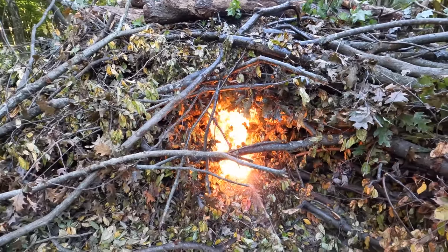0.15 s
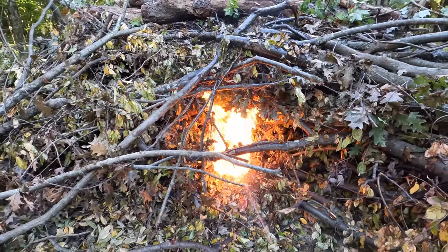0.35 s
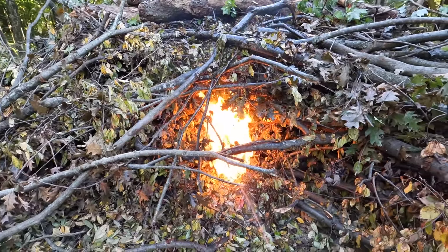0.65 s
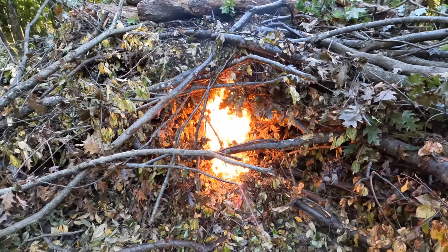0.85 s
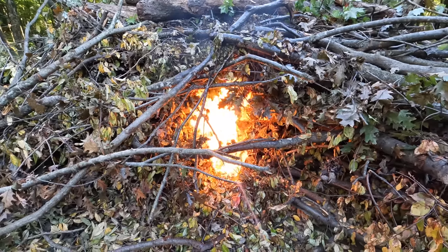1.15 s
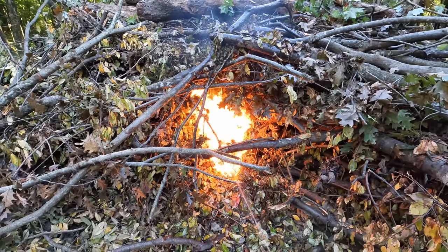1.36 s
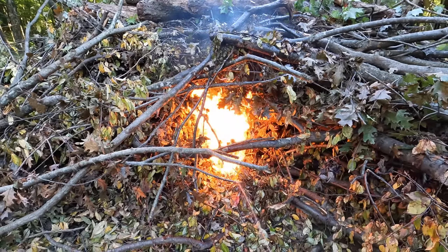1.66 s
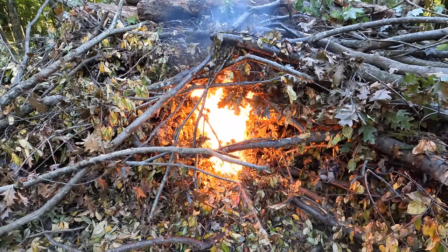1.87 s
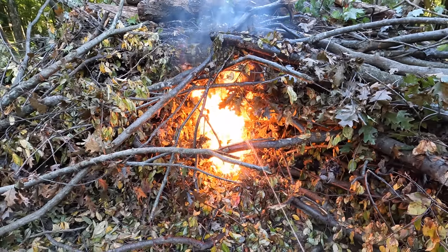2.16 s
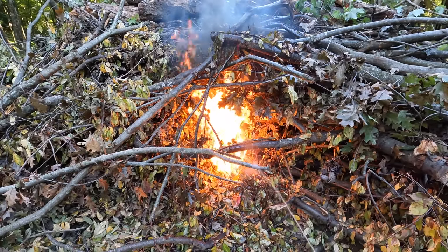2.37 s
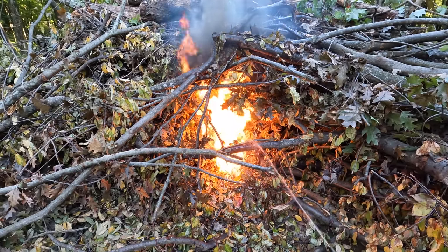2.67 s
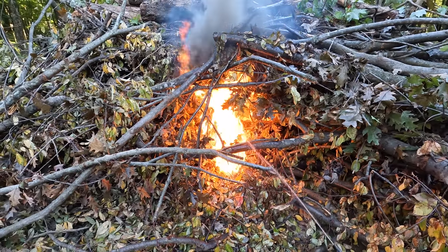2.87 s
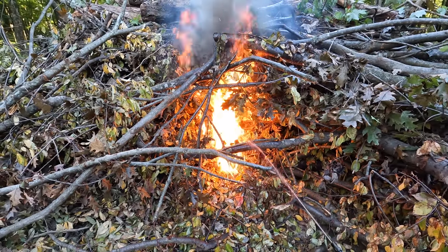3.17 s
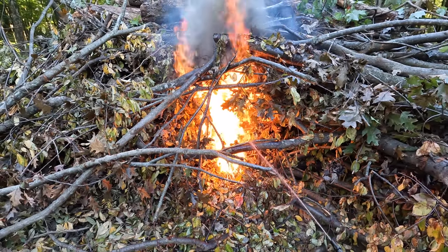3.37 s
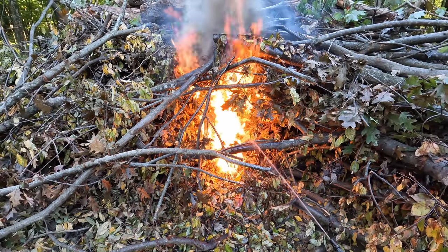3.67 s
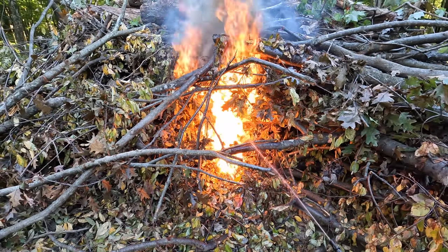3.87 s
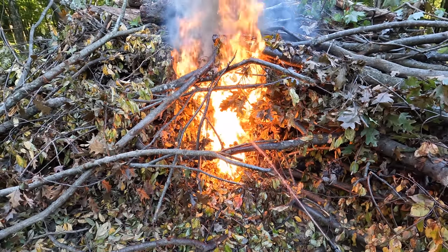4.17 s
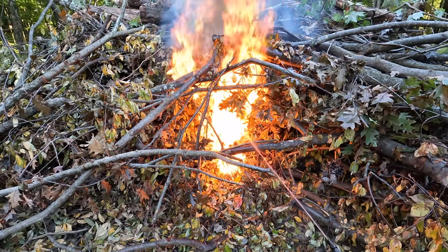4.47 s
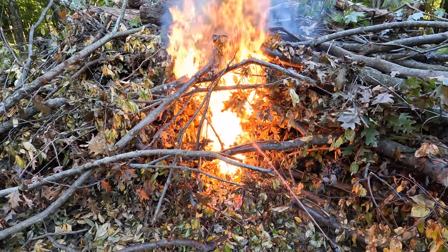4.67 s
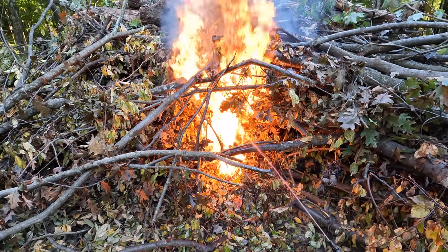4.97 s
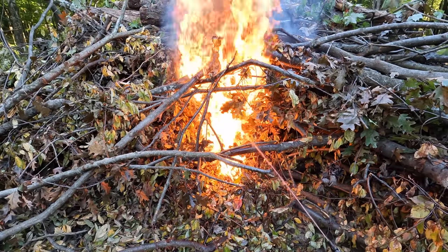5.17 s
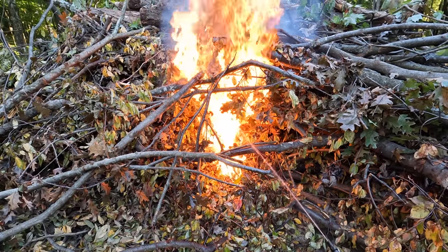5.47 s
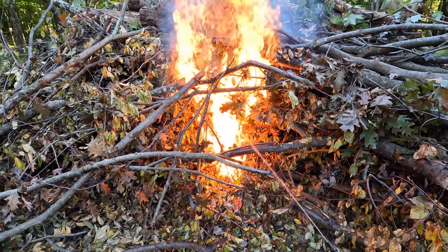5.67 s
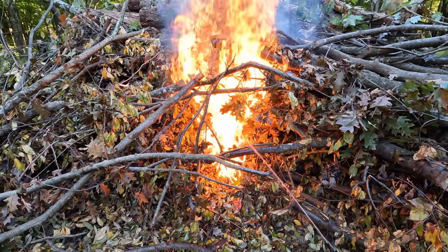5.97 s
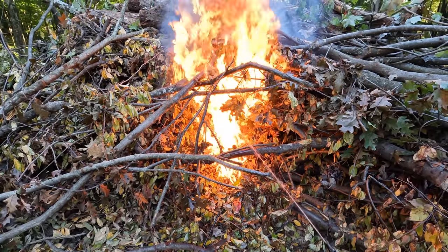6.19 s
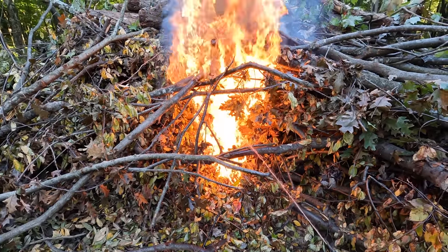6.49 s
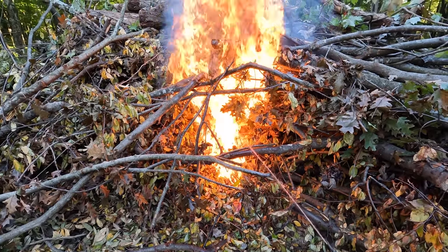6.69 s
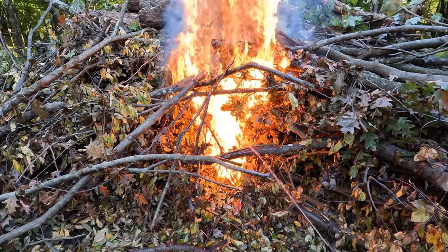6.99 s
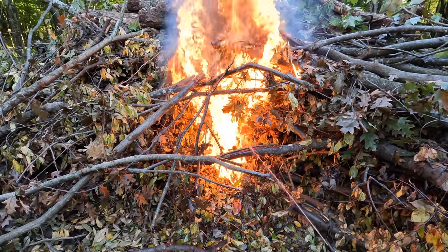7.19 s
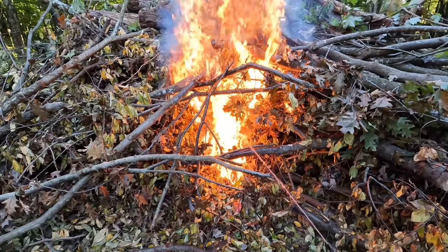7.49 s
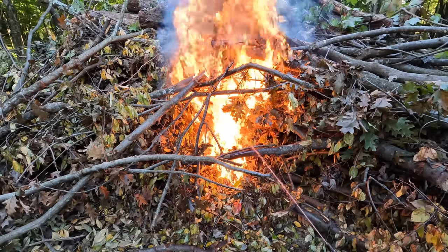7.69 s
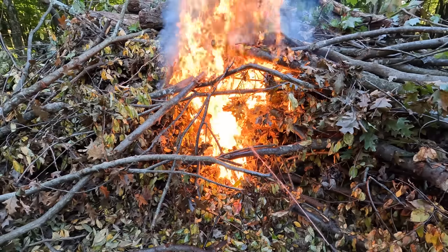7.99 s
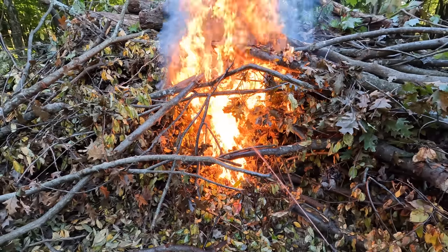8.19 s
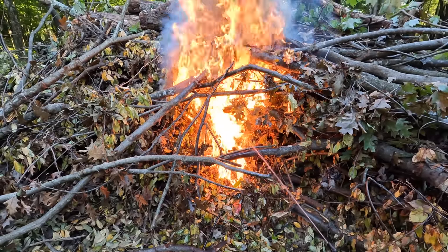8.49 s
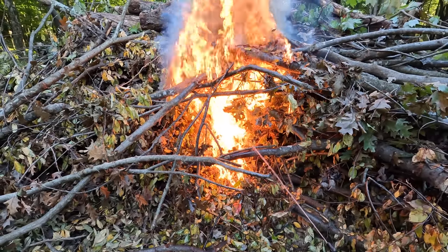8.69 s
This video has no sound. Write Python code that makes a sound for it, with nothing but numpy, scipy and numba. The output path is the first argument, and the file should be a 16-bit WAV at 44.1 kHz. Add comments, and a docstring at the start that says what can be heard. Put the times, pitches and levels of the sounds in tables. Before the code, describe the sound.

Close, bright, dense fire crackle with hissing steam, surging as flames climb through brush, then turning drier with crowded loud snaps and ticks.

```python
"""A pile of leafy branches catches fire outdoors, a few steps from a camera.
First dry leaves and twigs crack, as rung noise bursts, with close snaps; a low noise boom fills the pile.
Then steam turns the crackle into smooth noise, a sizzle, as the flames climb and break out; the boom goes.
The steam thins, the low noise roar builds, and soft low puffs come and go.
Late on the fuel is dry: needle-sharp pulses and loud snaps crowd the end."""
import sys
import numpy as np
from scipy import signal
from scipy.fft import rfft, irfft, next_fast_len
from scipy.io import wavfile
from scipy.ndimage import uniform_filter1d, minimum_filter1d, map_coordinates
from numba import njit

SR = 44100
rng = np.random.default_rng(int(sys.argv[2]) if len(sys.argv) > 2 else 0)


def wav_out(sig):
    """Save sig, one row per channel (or a flat mono array), as 16-bit PCM at SR to the path in sys.argv[1]."""
    wavfile.write(sys.argv[1], SR, np.round(np.clip(np.atleast_2d(sig).T, -1, 1) * 32767).astype(np.int16))


N = 389844

# burning of the pile: (time [s], blaze level [dB])
BLAZE = [(0.0, -19), (0.27, -21.5), (0.42, -20.5), (0.68, -19.5), (0.8, -19.5), (0.92, -20), (1.05, -22),
         (1.17, -19.5), (1.3, -16), (1.68, -17), (1.95, -13.5), (2.1, -15.5), (2.23, -13), (2.4, -16),
         (2.62, -17.5), (3.3, -16.5), (4.2, -16.5), (4.55, -15.5), (5.33, -17.5), (5.57, -17.5),
         (5.8, -16.5), (7.3, -17.5), (8.05, -18), (8.18, -18), (8.84, -19.5)]
# steam from damp leaves: (time [s], power share of smooth sizzle [0-1])
STEAM = [(0, .33), (1.15, .23), (1.3, .6), (2.6, .45), (4.6, .44), (6.5, .33), (7.4, .2)]
# draught of the flame column: (time [s], draught level [dB])
DRAUGHT = [(0, -34), (.5, -31), (1.2, -31.5), (1.75, -29.5), (2.1, -31.5), (2.28, -34), (2.9, -33),
           (3.4, -28.5), (3.57, -31), (3.8, -27.5), (4.5, -29), (4.85, -26.5), (5.2, -28), (5.38, -27),
           (5.65, -29), (7.2, -27), (8.84, -28)]
# treble of the leaves: (time [s], gain [dB])
TREBLE = [(0, 3.5), (.45, 4.5), (.8, 0), (1.3, 0.5), (2.1, 1), (2.36, 0.5), (2.55, -1.5), (4.5, -1),
          (6, 0.5), (8.84, 2)]

# clumps of leaves that catch at once: (middle [s], width at half height [s], lift [dB])
FLARES = [(.385, .03, 1.5), (.428, .025, 2), (.495, .03, 2.5), (.585, .03, 1), (.766, .025, 2),
          (.81, .04, 2), (1.45, .1, 1), (1.602, .025, 2), (1.99, .03, 1), (2.235, .04, 1), (2.35, .035, 2),
          (2.87, .15, 1), (3.035, .05, 2), (3.182, .04, 2), (3.75, .05, 1.2), (3.875, .04, 1.5),
          (4.42, .12, 1), (4.62, .04, 1.5), (4.825, .03, 2), (5.105, .05, 2), (5.25, .06, 1.5),
          (5.445, .03, 2), (5.993, .03, 2.5), (6.125, .025, 1), (6.49, .05, 2), (6.582, .03, 2),
          (6.82, .04, 1.2), (6.905, .03, 1.5), (6.953, .025, 2.5), (7.18, .04, 1.5), (7.298, .03, 2.5),
          (7.33, .025, 2), (7.479, .03, 2.5), (7.527, .02, 1.5), (7.66, .07, 1.5), (7.83, .025, 2),
          (8.15, .06, 2.5), (8.23, .06, 1.5), (8.385, .03, 1.5), (8.43, .02, 2), (8.315, .05, 2),
          (8.49, .035, 2.5), (8.615, .07, 3), (8.725, .035, 2), (8.772, .025, 3)]
# short dips in the crackle level: (middle [s], width at half height [s], change [dB])
DIPS = [(.215, .04, -2), (.316, .05, -1), (.528, .035, -3), (1.05, .03, -1.5), (2.6, .06, -1),
        (2.99, .025, -2), (3.091, .05, -1.6), (3.638, .04, -2), (4.064, .03, -2.3), (4.244, .04, -2.2),
        (4.665, .03, -1.5), (5.018, .05, -3), (5.576, .04, -3), (5.753, .035, -1.5), (6.436, .04, -1.5),
        (7.108, .04, -1.3), (7.154, .018, -2.5), (7.215, .02, -1), (7.768, .028, -2.5), (7.927, .025, -3),
        (8.045, .06, -2.5), (8.454, .035, -2), (8.663, .016, -4), (8.801, .022, -3)]
# loudest bursts of wood: (time [s], level before colouring [dB], ring [Hz], tearing re first break [dB])
SNAPS = [(0.1387, -8, 6000, 4), (0.1934, -13.5, 5000, -4), (0.2417, -13, 6300, -1), (0.2638, -8.5, 6000, 2),
         (0.4268, -12.5, 5000, 0), (0.4886, -13, 4400, 1), (0.5806, -12.5, 5600, 0),
         (0.6648, -13, 5000, -3), (0.8234, -11.5, 4000, -4), (0.9756, -13.5, 5200, -6),
         (1.0059, -11.5, 4800, -6), (1.0708, -9, 5400, -3), (1.0958, -14, 5000, -2), (1.1045, -6, 5200, -1),
         (1.1475, -12.5, 6000, 5), (1.5453, -11, 5000, -2), (2.5107, -11, 3900, -6),
         (3.0224, -10.5, 5900, 3), (3.0484, -11.5, 4200, -3), (3.7014, -11, 5000, -4),
         (3.8803, -10, 5400, -1), (5.2845, -12, 4200, -4), (5.3651, -13, 5500, 3), (5.6397, -10, 4600, -4),
         (5.9417, -10, 5500, 0), (5.992, -9.5, 4300, 0), (6.1295, -10, 6300, -6), (6.1553, -11.5, 5000, -3),
         (6.2182, -11, 5000, -3), (6.3004, -11, 4600, 2), (6.3648, -11.5, 5000, -3),
         (6.5838, -10.5, 5000, -2), (6.9126, -10.5, 5000, -2), (7.0723, -7, 7500, -7),
         (7.1325, -12, 7500, -1), (7.164, -7.5, 4800, -1), (7.2558, -11.5, 5200, 1),
         (7.2951, -9.5, 5000, 3), (7.5237, -11.5, 5000, -2), (7.7824, -7, 6200, -5),
         (7.835, -8.5, 5800, -2), (7.9046, -6, 6500, -1), (7.9931, -12.5, 6000, 0), (8.1592, -8, 5900, 3),
         (8.3134, -10.5, 6500, 0), (8.3259, -11, 5700, -2), (8.496, -8, 4900, 1), (8.5339, -9.5, 5500, -2),
         (8.5933, -10, 4000, -1), (8.6455, -6, 5000, -2), (8.6716, -7, 5200, 0), (8.7679, -11, 5600, 7)]
# sharpest ticks of dry leaves: (time [s], pulse level [dB])
NEEDLES = [(.4981, 2), (2.5565, 2), (2.6361, 0), (2.7058, 1), (2.8001, 0), (2.9469, 0), (2.9735, 1),
           (3.0646, 3.5), (3.4243, 0), (3.535, 0), (3.7012, 1), (3.9366, 0), (4.1054, 1.5), (4.2944, 0),
           (4.6551, 3), (4.7353, 0), (4.8339, 2), (4.9861, 2.5), (5.1187, 2), (5.1628, 3.5), (5.2912, 7),
           (5.383, 1.5), (5.3921, 2.5), (5.4812, 0), (5.5071, 1), (6.0026, 3), (6.394, 0), (6.4155, 2),
           (6.8079, 2), (7.1327, 2), (7.2013, 3), (7.3847, 3.5), (7.426, 0), (7.5624, 3), (7.7288, 0),
           (7.7462, 3), (7.9009, 1), (8.1212, -1), (8.3875, 2), (8.5184, 2), (8.5345, 1.5), (8.5515, 1),
           (8.5745, 0), (8.7805, 2)]
# gas pockets that ignite with a soft thump: (time [s], level [dB])
PUFFS = [(.795, -22), (.96, -22.5), (3.38, -27), (1.59, -27), (1.765, -24.5), (2.0, -26), (2.11, -23),
         (2.52, -28), (4.6, -26), (5.385, -23)]
# large gaps that ring as flames pass: (middle [s], width at half height [s], ring [Hz], lift [dB])
HOLLOWS = [(.7, 1.2, 740, 4.5), (1.2, 2.9, 2330, 3), (1.65, 1.7, 1440, 4), (3.852, 0.71, 990, 3.5),
           (4.2, .8, 554, 2), (4.55, 0.77, 2070, 1.5)]

# source spectra: (frequency [Hz], relative density [dB per Hz])
LEAF_COLOUR = [(1500, -34), (2300, -3), (2650, -8), (3400, -0.5), (5200, -0.5), (7500, -2), (8200, -7),
               (9100, -6.5), (9900, -3.5), (11500, -11.5), (14200, -21), (15000, -74)]
TICK_COLOUR = [(300, -12.5), (900, 2.5), (2000, 1.5), (3500, 4), (7500, 1.5), (10500, -11.5), (12000, -19),
               (14500, -31), (15500, -40)]
NEEDLE_COLOUR = [(300, -18), (1200, -2), (2500, 1), (4500, 0), (7500, -3.5), (10500, -7), (12500, -14),
                 (14300, -21), (15500, -36)]
SNAP_COLOUR = [(300, -6), (1200, 1), (7500, 0.5), (8400, -3.5), (10300, -1), (12000, -11), (14300, -19),
               (15500, -30)]
TWIG_COLOUR = [(200, -28), (350, -2.5), (480, -7.5), (660, -3.5), (820, -6.5), (1000, -3.5), (1300, 0.5),
               (1550, -2.5), (2100, -0.5), (2650, -3.5), (3500, -5), (6000, -46)]
PUFF_COLOUR = [(20, -8), (45, 0), (85, 0), (125, -4), (200, -16), (400, -45)]
RUMBLE_COLOUR = [(8, -13), (22, 1), (45, 1.5), (75, 0.5), (105, -3.5), (160, -19), (400, -68)]
FLUTTER_COLOUR = [(70, -18), (125, -1), (185, -2.5), (260, -2), (340, -6), (480, -14.5), (1200, -44)]
BOOM_COLOUR = [(60, -14), (115, 0), (165, -1), (235, 0.5), (275, -5.5), (330, -12), (450, -13), (800, -44)]

# left port over right: (frequency [Hz], level [dB])
TILT = [(60, 0.5), (110, 0), (200, 0.9), (380, -2.5), (700, -2), (1290, -1.0), (2380, -1.5), (4400, -1.2),
        (8120, 0.5), (15000, 1.0)]
# left port over right: (frequency [Hz], phase [rad])
LEAD = [(100, -0.051), (1700, 0.19), (2600, -0.98), (4400, -0.49), (4800, -0.0093), (6700, 0),
        (7400, -0.74), (10000, 0.41)]
# stereo side gain: (frequency [Hz], gain [dB])
WIDTH = [(60, -39), (150, -29), (330, -16), (500, -10), (800, -17.5), (1700, -15.5), (2700, -30),
         (4400, -14.5), (4900, -24), (6600, -23), (7400, -11.5), (8800, -10.5), (10500, -23), (12500, -1.5)]

# re blaze level; twigs slowly fall behind
LEAF_DB, TICK_DB, TWIG_DB, TWIG_FADE_DB_PER_S = -0.86, -5.5, -9, 0.15
# single tongues of flame swing the blaze level, more where the fuel is dry
SURGE_DB, SURGES_PER_S = 0.4, 26
TREBLE_HZ = 8450
# chance needles: rate, mean and scatter of level
NEEDLES_PER_S, NEEDLE_DB, NEEDLE_SCATTER_DB = 12, -5.5, 1.3
# chance snaps: rate, then mean and scatter of (level re blaze [dB], ring [Hz], tearing [dB])
SNAPS_PER_S = 3
SNAP_MEAN, SNAP_SCATTER = (2, 4800, -3), (1.2, 1000, 3)
PUFF_S = .03  # width at half power
# rumble re draught; flutter level and its share of the draught's swing
RUMBLE_DB, RUMBLE_LUMPS_DB = -1.5, 1.4
FLUTTER_DB, FLUTTER_LUMPS_DB, FLUTTER_FOLLOWS = -36, 0.82, 0.65
# boom of the hollow under the leaves, until the flames break out
BOOM_DB, BOOM_LUMPS_DB, BREAKOUT_S, BREAKOUT_FADE_S = -35, 2.4, 2.11, .5
HOLLOW_WIDTH_HZ, COLOUR_DRIFT_DB = 170, 1.1
# climb from seat to top; share of the sound from the top before it
CLIMB_START_S, CLIMB_S, TOP_SHARE = 1.64, 0.78, 0.31
# extra bounce while the flame column is short; time when fully grown
SHORT_FLAME_BOUNCE, GROWN_S = .5, 6
# limiter recovery and band limit
RECOVERY_DB_PER_S, TOP_HZ = 130, 15700


def leaves(heat_db, flurry_db, steam):
    """Thin leaves burst in a dense bright crackle over the sizzle of their steam."""
    pitches_hz = np.geomspace(1600, 11000, num=600)
    shapes = cracks(pitches_hz, sharpness=.9, splinter_db=-1, splinter_t60_s=.005,
                    scatter_db=-3, scatter_t60_s=.04)
    bursts = crackle(shapes, rate_per_s=2700, spread_db=6, range_db=14, clumping_db=flurry_db)
    bursts = coloured(bursts, LEAF_COLOUR)
    sizzle = coloured(noise_pair() * amp(.5 * flurry_db), LEAF_COLOUR)
    mix = np.sqrt(1 - steam) * bursts + np.sqrt(steam) * sizzle
    return amp(heat_db + LEAF_DB) * evened(mix, seconds=.046)


def brightened(x):
    """Set the level of the treble of x by the TREBLE curve."""
    treble = filtered(x, lambda hz: 1 - 1 / (1 + (hz / TREBLE_HZ) ** 8))
    return x + (amp(curves(TREBLE)[0]) - 1) * treble


def ticks(heat_db, flurry_db, steam):
    """Dry leaf edges facing the camera tick once, wide in pitch and with next to no scatter."""
    pitches_hz = np.geomspace(1600, 8000, num=200)
    shapes = cracks(pitches_hz, sharpness=.4, splinter_db=-3, splinter_t60_s=.003,
                    scatter_db=-9, scatter_t60_s=.015)
    sparse = crackle(shapes, rate_per_s=360, spread_db=5, range_db=6.5, clumping_db=flurry_db)
    return amp(heat_db + TICK_DB) * (1 - steam) * coloured(sparse, TICK_COLOUR)


def needles(steam):
    """A dry leaf blister bursts in plain view: one sharp pulse, its mid part of fixed sign, no ring."""
    chance_s = dry_moments(steam, NEEDLES_PER_S)
    chance_db = rng.normal(NEEDLE_DB, NEEDLE_SCATTER_DB, len(chance_s))
    s, db = np.vstack([NEEDLES, np.column_stack([chance_s, chance_db])]).T
    lean = .5 * rng.standard_normal(len(s))
    pulses = np.zeros((2, N))
    pulses[:, (s * SR).astype(int)] = -amp(db) * [np.ones(len(s)), lean]
    colour = lambda hz: amp(along(NEEDLE_COLOUR, hz))
    return filtered(pulses, colour) / colour(np.arange(SR // 2)).mean()


def snaps(rows, size=1024):
    """Steam pockets split the wood near the surface: a sharp break, then milliseconds of tearing."""
    s, db, ring_hz, tear_db = np.transpose(rows)
    t = np.arange(size) / SR
    noise = rng.standard_normal((len(s), 4, size)).transpose(1, 0, 2)
    split = ring(noise[:2] * amp(-60 * t / .0045), ring_hz, sharpness=.8)
    # a fibre springs back only so far
    split = np.tanh(2 * split / np.abs(split).max(axis=-1, keepdims=True))
    tear = ring(noise[2:] * (1 - np.exp(-t / .001)) * amp(-60 * t / .022), ring_hz, sharpness=.8)
    shapes = energy_one(split) + amp(tear_db[:, None]) * energy_one(tear)
    sizes = amp(db) * np.sqrt(.003 * SR) / np.linalg.norm(shapes[0], axis=-1)  # level over 3 ms
    reports = stamp(shapes, np.arange(len(s)), (s * SR).astype(np.int64), sizes, N)
    return filtered(reports, lambda hz: amp(along(SNAP_COLOUR, hz)))


def lesser_snaps(heat_db, steam):
    """Rows like SNAPS at random moments, mostly dry ones, as strong as the blaze is then."""
    s = dry_moments(steam, SNAPS_PER_S)
    over_db, ring_hz, tear_db = (SNAP_MEAN + rng.standard_normal((len(s), 3)) * SNAP_SCATTER).T
    return np.column_stack([s, heat_db[(s * SR).astype(int)] + over_db, ring_hz, tear_db])


def twigs(heat_db, flurry_db, steam):
    """Twigs deep in the pile pop lower and duller, over the rush of hot gas."""
    pitches_hz = np.geomspace(700, 4000, num=400)
    shapes = cracks(pitches_hz, sharpness=1.02, splinter_db=0, splinter_t60_s=.0058,
                    scatter_db=0, scatter_t60_s=.033)
    pops = crackle(shapes, rate_per_s=1700, spread_db=4, range_db=4.5, clumping_db=.53 * flurry_db)
    pops = coloured(pops, TWIG_COLOUR)
    rush = coloured(noise_pair() * amp(flurry_db), TWIG_COLOUR)
    mix = np.sqrt(1 - steam) * pops + np.sqrt(steam) * rush
    level_db = heat_db + TWIG_DB - TWIG_FADE_DB_PER_S * np.arange(N) / SR
    return amp(level_db) * evened(mix, seconds=.069)


def puffs():
    """Each pocket of gas swells and dies within a few low cycles."""
    t = np.arange(N) / SR
    swell = sum(amp(db) * np.exp2(-np.minimum(2 * ((t - s) / PUFF_S) ** 2, 20)) for s, db in PUFFS)
    return swell * evened(coloured(noise_pair(), PUFF_COLOUR), seconds=PUFF_S)


def flames():
    """Rising gas rumbles and flutters unevenly; it also booms while shut inside the pile."""
    draught_db, = curves(DRAUGHT)
    rumble_db = draught_db + RUMBLE_DB + RUMBLE_LUMPS_DB * wobble(12)
    rumble = amp(rumble_db) * evened(coloured(noise_pair(), RUMBLE_COLOUR), seconds=.2)
    flutter_db = FLUTTER_DB + FLUTTER_FOLLOWS * (draught_db - draught_db.mean())
    flutter_db = flutter_db + FLUTTER_LUMPS_DB * wobble(20)
    flutter = amp(flutter_db) * evened(coloured(noise_pair(), FLUTTER_COLOUR), seconds=.12)
    shut_in = np.clip((BREAKOUT_S - np.arange(N) / SR) / BREAKOUT_FADE_S + .5, 0, 1)
    boom = shut_in * amp(BOOM_DB + BOOM_LUMPS_DB * wobble(23)) * coloured(noise_pair(), BOOM_COLOUR)
    return rumble + flutter + boom


def ground(x, seat_delay_s=.00153, seat_drift=.00005, top_delay_s=.001063, seat_bounce=.58, top_bounce=.15):
    """Two ground bounces comb the sound, cross-fading from a slowly drifting delay to a shorter fixed one."""
    top, t = climbed(), np.arange(N) / SR
    soft = filtered(x, lambda hz: 1 / (1 + (hz / 2000) ** 2))  # leaf litter soaks up the treble
    late = lambda delay_s: np.array([np.interp(t - delay_s, t, channel) for channel in soft])
    from_seat = (1 - top) * seat_bounce * late(seat_delay_s + seat_drift * t)
    top_gain = top_bounce + SHORT_FLAME_BOUNCE * np.maximum(1 - t / GROWN_S, 0)
    return x + from_seat + top * top_gain * late(top_delay_s)


def climbed():
    """Share of the sound that comes from the top of the pile."""
    progress = np.clip((np.arange(N) / SR - CLIMB_START_S) / CLIMB_S, 0, 1)
    return np.clip(TOP_SHARE + (1 - TOP_SHARE) * progress, 0, 1)


def hollows(x):
    """Gaps between branches ring at their own pitches, opening and closing as the fuel burns away."""
    hz, s, z = signal.stft(x, SR, nperseg=1024)
    lift_db = sum(db * np.outer(bell(hz, ring_hz, HOLLOW_WIDTH_HZ), bell(s, middle, width))
                  for middle, width, ring_hz, db in HOLLOWS)
    # slow random colour drift over frequency and time
    drift = rng.standard_normal(z.shape[1:])
    for _ in range(2):
        drift = uniform_filter1d(uniform_filter1d(drift, size=4, axis=0), size=20, axis=1)
    drift_db = COLOUR_DRIFT_DB * unit(drift) * (hz > HOLLOW_WIDTH_HZ)[:, None]
    return signal.istft(z * amp(lift_db + drift_db), SR, nperseg=1024)[1][:, :N]


def ports(pair):
    """Mid and side become left and right; the camera body shades and delays one port."""
    mid, side = pair[0], filtered(pair[1], lambda hz: amp(along(WIDTH, hz)))
    shade = lambda hz: amp(along(TILT, hz) / 2) * np.exp(1j * along(LEAD, hz) / 2)
    return filtered(np.array([mid + side, mid - side]), lambda hz: np.array([shade(hz), 1 / shade(hz)]))


def cracks(ring_hz, sharpness, splinter_db, splinter_t60_s, scatter_db, scatter_t60_s, size=768):
    """One crack per pitch: break and splintering ring the fibre, then scatter among the branches."""
    t = np.arange(size) / SR
    noise = rng.standard_normal((len(ring_hz), 4, size)).transpose(1, 0, 2)
    toughness, dryness, lean = rng.standard_normal((3, len(ring_hz), 1))
    # brittle fibres tick once, tough ones tear for longer
    tearing = amp(-60 * t / (splinter_t60_s * np.exp(toughness / 2)))
    splinters = energy_one(noise[:2] * np.abs(noise[:2]) * tearing)
    scatter = energy_one(noise[2:] * amp(-60 * t / scatter_t60_s))
    push = amp(splinter_db + 1.45 * toughness) * splinters + amp(scatter_db) * scatter
    push[0, :, :1] += 1  # the break reaches both ports alike
    push[1, :, :1] += lean  # and leans to one side by chance
    return ring(push, ring_hz, sharpness * np.exp(dryness))  # dry fibres ring, damp ones click


def crackle(shapes, rate_per_s, spread_db, range_db, clumping_db):
    """Cracks at random moments, many small and few large, larger where clumping is high."""
    count = int(rate_per_s * N / SR)
    starts = rng.integers(0, N, count)
    sizes_db = spread_db * rng.standard_normal(count) + clumping_db[starts]
    large_db = range_db * np.tanh(np.maximum(sizes_db, 0) / range_db)  # large ones level off
    sizes = amp(large_db + np.minimum(sizes_db, 0)) * rng.choice([-1, 1], count)
    return stamp(shapes, rng.integers(0, shapes.shape[1], count), starts, sizes, N)


def ring(push, ring_hz, sharpness):
    """Each push through the resonance of its own fibre."""
    f, centre = np.fft.rfftfreq(push.shape[-1], 1 / SR), ring_hz[:, None]
    damping = 1j * f * centre / sharpness
    return irfft(rfft(push) * np.sqrt(sharpness) * damping / (centre ** 2 - f ** 2 + damping))


@njit
def stamp(shapes, which, starts, sizes, length):
    """Sum of two-channel shapes, each placed at its start with its size."""
    out = np.zeros((2, length))
    for i in range(len(starts)):
        for j in range(min(shapes.shape[2], length - starts[i])):
            out[0, starts[i] + j] += sizes[i] * shapes[0, which[i], j]
            out[1, starts[i] + j] += sizes[i] * shapes[1, which[i], j]
    return out


def dry_moments(steam, rate_per_s):
    """Random moments [s], most of them where little steam holds the fuel back."""
    chance = np.cumsum((1 - steam) ** 3)
    return np.searchsorted(chance, rng.random(int(rate_per_s * N / SR)) * chance[-1]) / SR


def swells(rows):
    """Level change [dB] from (middle [s], width [s], change [dB]) rows, each a smooth hump."""
    t = np.arange(N) / SR
    change_db = np.zeros(N)
    for s, width, db in rows:
        near = slice(*np.searchsorted(t, [s - 2 * width, s + 2 * width]))
        change_db[near] += db * bell(t[near], s, width)
    return change_db


def bell(x, middle, width):
    """A smooth hump of height 1, its width taken at half height."""
    return np.exp2(-np.minimum((2 * (x - middle) / width) ** 2, 20))


def evened(x, seconds):
    """x at a running rms near 1, so the heat is shared among however many bursts there are."""
    width = max(int(seconds * SR), 1)
    power = uniform_filter1d(uniform_filter1d(x[0] ** 2, width), width)  # of the mid
    return x / np.sqrt(np.abs(power) + 1e-9)


def noise_pair():
    """White noise for mid and side."""
    return rng.standard_normal((2, N))


def wobble(knots_per_s):
    """A smooth random curve through random knots."""
    knots = rng.standard_normal(int(N * knots_per_s / SR) + 4)
    return map_coordinates(knots, [np.arange(N) * knots_per_s / SR])


def curves(rows):
    """One value per sample for each column after the time."""
    s, *cols = np.transpose(rows)
    return [np.interp(np.arange(N) / SR, s, c) for c in cols]


def coloured(x, spectrum):
    """x shaped by the given spectrum, at rms 1."""
    return unit(filtered(x, lambda hz: amp(along(spectrum, hz))))


def filtered(x, response):
    """x times a response of frequency."""
    m = next_fast_len(N + SR // 4)
    return irfft(rfft(x, m) * response(np.fft.rfftfreq(m, 1 / SR)), m)[..., :N]


def along(points, hz):
    """(frequency [Hz], value) points interpolated on a log axis."""
    f, v = np.transpose(points)
    return np.interp(np.log(hz + 1), np.log(f + 1), v)


def amp(db):
    """Decibels to gain."""
    return 10 ** (np.asarray(db) / 20)


def unit(x):
    """x at rms 1."""
    return x / np.sqrt(np.mean(x ** 2) + 1e-20)


def energy_one(x):
    """Each row at energy 1."""
    return x / np.linalg.norm(x, axis=-1, keepdims=True)


def scene():
    """Each tongue of flame sets off a flurry of cracks in leaves and twigs together."""
    steam = np.clip(curves(STEAM)[0], 0, 1)
    flurry_db = (1 - steam) * (1.15 * wobble(70) + 1.5 * wobble(200))
    surge_db = SURGE_DB * (1 - steam) * wobble(SURGES_PER_S)
    heat_db = curves(BLAZE)[0] + swells(FLARES) + swells(DIPS) + surge_db
    inside = brightened(leaves(heat_db, flurry_db, steam))
    inside = inside + ground(twigs(heat_db, flurry_db, steam) + flames())
    surface = ticks(heat_db, flurry_db, steam) + needles(steam)
    surface = surface + snaps(SNAPS) + snaps(lesser_snaps(heat_db, steam))
    return ports(hollows(inside) + surface + puffs())


def record(dry):
    """The camera's limiter ducks at once under peaks over full scale, recovers briskly, then band-limits."""
    over_db = 20 * np.log10(np.maximum(np.abs(dry).max(axis=0), 1))
    recovered_db = RECOVERY_DB_PER_S * np.arange(N) / SR
    needed = amp(recovered_db - np.maximum.accumulate(over_db + recovered_db))
    gain = uniform_filter1d(minimum_filter1d(needed, size=13), size=13)
    return filtered(dry * gain, lambda hz: hz < TOP_HZ)


dry = scene()
out = record(dry)
wav_out(out)
```